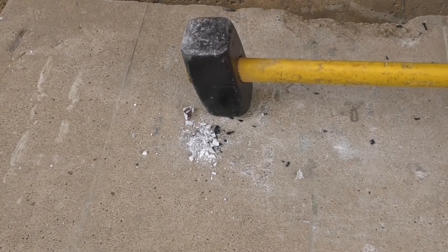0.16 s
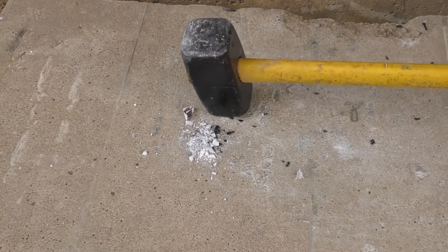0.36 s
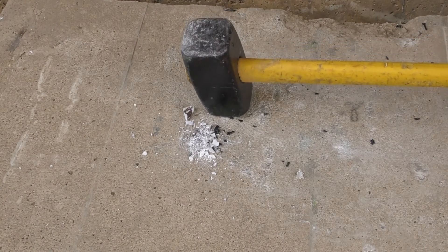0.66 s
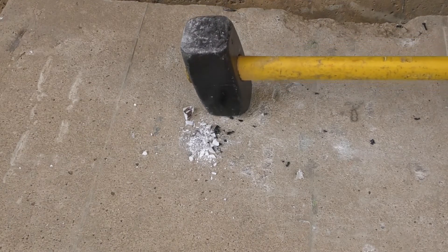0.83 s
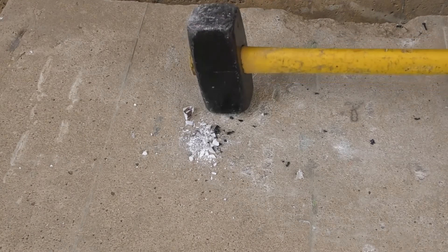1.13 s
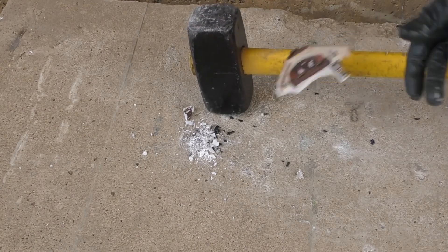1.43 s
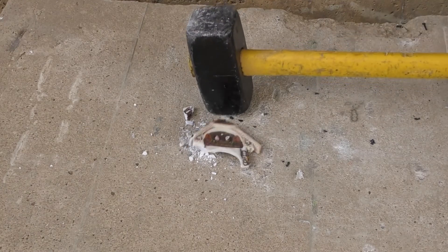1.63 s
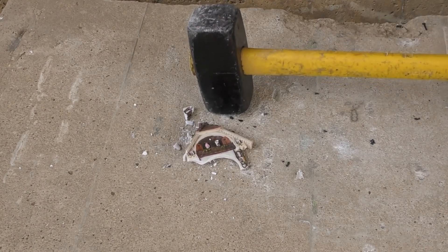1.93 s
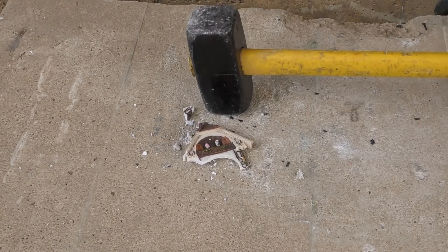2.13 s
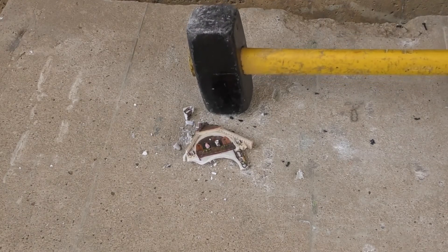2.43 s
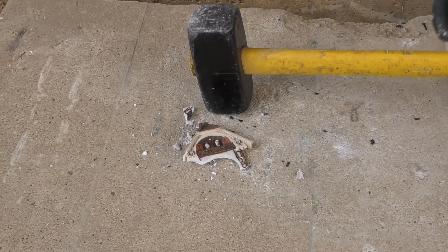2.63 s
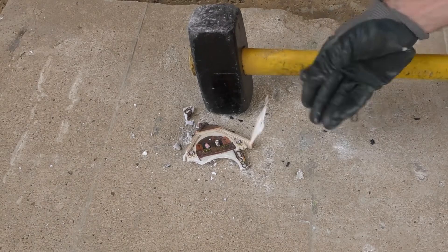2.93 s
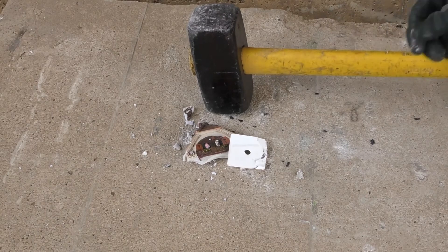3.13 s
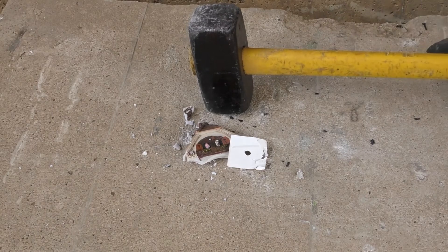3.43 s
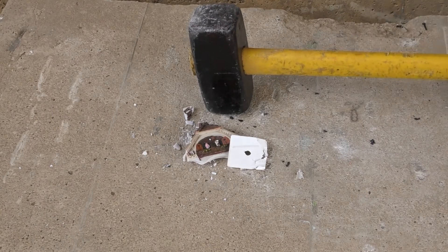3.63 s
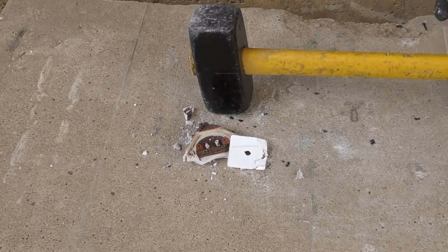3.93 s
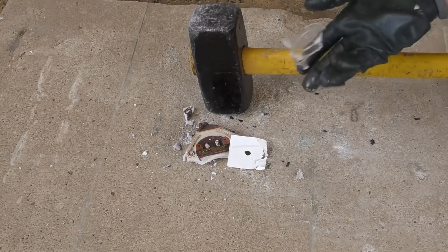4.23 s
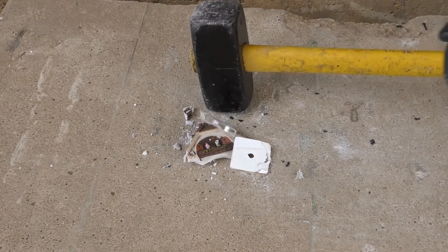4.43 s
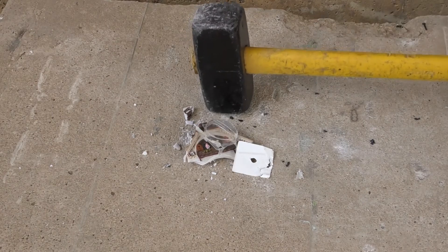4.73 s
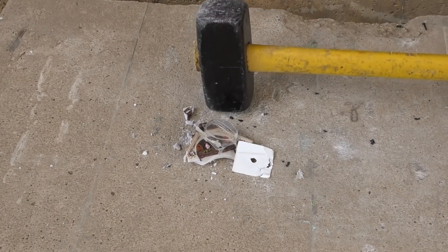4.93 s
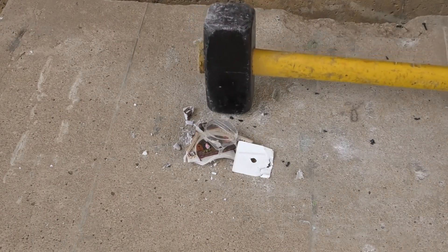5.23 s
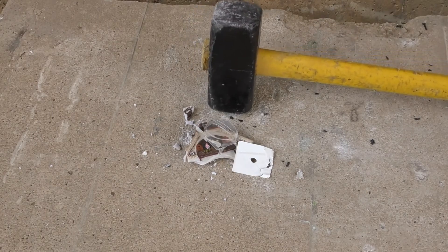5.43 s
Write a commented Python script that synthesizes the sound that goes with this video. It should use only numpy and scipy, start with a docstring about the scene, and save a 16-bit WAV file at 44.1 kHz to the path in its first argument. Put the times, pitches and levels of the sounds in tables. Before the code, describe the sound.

A sledgehammer head scrapes and clinks on gritty concrete, then three plastic pieces are tossed down, cracking and clattering over a low hum.

```python
"""A steel sledgehammer head is dragged over gritty concrete: knocks ring its modes, tiny slips scrape.
Three plastic pieces are then tossed down: a moulded shell thuds and cracks, a flat plate and a
clear piece clatter after it. Gloves rustle; rumble, hum and a background rush fill the hard room.
Automatic gain ducks after the loud landings."""
import sys
import numpy as np
from scipy import signal
from scipy.fft import rfft, irfft
from scipy.io import wavfile
from scipy.ndimage import uniform_filter1d

SR = 44100
rng = np.random.default_rng(int(sys.argv[2]) if len(sys.argv) > 2 else 0)


def to_wav(sig):
    """Store sig (one row per channel, or 1-D mono) as 16-bit WAV at the path in sys.argv[1].

    Samples outside -1..1 are clipped; the rate is SR.
    """
    pcm = np.clip(np.atleast_2d(sig), -1, 1) * 32767
    pcm = np.round(pcm).astype(np.int16)
    wavfile.write(sys.argv[1], SR, pcm.T)  # frames by channels


N = 246078
TIME_S = np.arange(N) / SR

# Contacts: t/s, level/dB, brightness/dB (high band over low), ping/dB (mid-band weight)
HEAD_KNOCKS = [(0.0315, -15.5, 8, -8), (0.0338, -11, -22, -0.5), (0.068, -24.5, -22, -10),
               (0.091, -28, -14, -12), (0.105, -25.5, 9, 4), (0.169, -24.5, 7, 1), (0.374, -14, 16, 5),
               (0.401, -14, 16, -4), (0.407, -11.5, 21, 7), (0.4125, -11, 32, -4), (0.4412, -20.5, 2, -13),
               (0.4605, -10, 15.5, 0), (0.6616, -16, 4, -1), (0.7478, -6.5, 2, 4), (0.905, -30.5, 29, 3),
               (1.251, -35.5, -2, -28)]
SHELL_KNOCKS = [(1.5653, -17.5, 0, 4), (1.5735, 2, -5, -28), (1.5826, 6.5, -6.5, 1.5),
                (1.5868, 9.5, 14, 14.5), (1.5922, -3, 5, -9), (1.6137, -27, -21, -5), (1.6205, -5, -3, 12),
                (1.702, -19, 22, -5), (1.72, -16, 26, 12), (1.746, -12.5, 22, -0.5), (1.7995, -7, 21, 1.5)]
PLATE_KNOCKS = [(3.0094, -22, -0.5, -1), (3.0262, -29, 3, 3.5), (3.0528, -21.5, 22, 4),
                (3.33, -33.5, 16, -1), (3.393, -30.5, -2, -2), (4.118, -38.5, 16, 11)]
CLEAR_KNOCKS = [(4.4292, -6.5, 29, 3), (4.439, -4, 4.5, 2), (4.4415, -3, 7, 2.5), (4.4443, -3.5, 8.5, -1),
                (4.451, -21, 13, 17), (4.487, -16, 4, 1), (4.518, -15, 10, 0.5), (4.5703, -9.5, 15, 5),
                (4.574, -17.5, -16, -2), (4.605, -30, -6, 6), (4.61, -21, -4, -11), (4.891, -33.5, 24, 0)]
# Low, mid, high contact bands: lower f/Hz, upper f/Hz
KNOCK_BANDS = [(1000, 4000), (4000, 9000), (9000, 16000)]
# Modes: f/Hz, relative level/dB, factor on contact t60
HEAD_MODES = [(2075, 2.5, 1.13), (2460, 13, 0.2), (2836, 6, 0.85), (5490, 0, 0.86), (6240, 3.5, 0.6),
              (6940, -22, 1.8), (9750, 4, 0.54), (10850, -4, 0.84), (11060, -19, 0.91), (11700, 0, 1.2)]
SHELL_MODES = [(2080, -1.5, 0.86), (2333, -1, 2.2), (2762, 2, 2.1), (3090, 6.5, 1.6), (4230, -5, 1.2),
               (5000, -11, 0.9), (5300, 3.5, 1.4), (6840, -1.5, 1.7), (8700, 2, 0.4), (10100, 7, 0.23)]
PLATE_MODES = [(2870, -4, 0.95), (3330, 5, 0.62), (4080, 5.5, 1), (5400, 1, 0.97), (7900, 6, 0.8),
               (10000, 11, 0.65), (11500, -8, .8)]
CLEAR_MODES = [(2170, -6.5, 2.6), (3038, -0.5, 1.2), (3444, 2, 1.4), (4450, -7, 0.84), (5600, 2, 1.3),
               (6780, 3.5, 1.5), (7460, 5, 0.74), (8850, 3, 1.2), (10000, -6, 0.53), (10600, 9.5, 0.82),
               (12800, -21, 0.73)]
# Weight hitting the slab: t/s, peak level/dB, f/Hz, t60/s
THUDS = [(0.0314, -21, 406, 0.0097), (0.0333, -20.5, 647, 0.0061), (0.6632, -19, 90.5, 0.054),
         (.748, -36, 373, 0.018), (1.5731, 7.5, 83, 0.019), (1.583, 7, 168, 0.02),
         (4.4416, -22, 190, 0.017)]
# Noise spectra: f/Hz, relative level/dB
RUMBLE_COLOUR = [(15, -16), (35, -10), (60, -0.5), (95, 6), (122, -3.5), (200, -38), (400, -85)]
HUM_COLOUR = [(70, -15), (125, -7), (165, -4), (210, 0.5), (270, -4), (330, -10), (400, -29), (480, -62),
              (900, -90)]
RUSH_COLOUR = [(450, -29.5), (680, -4.5), (850, -6.5), (1020, 3.5), (1400, 0), (1750, -5), (2200, -7),
               (3000, -14), (4200, -13.5), (5500, -22.5), (6800, -28.5), (10000, -14.5), (13000, -18.5),
               (16000, -20.5)]
LOW_WASH_COLOUR = [(250, 14), (400, 5.5), (500, 3), (700, 11.5), (1200, -38), (2000, -1), (3000, -7),
                   (6300, -5), (10000, -19), (16000, -26)]
DRAG_COLOUR = [(500, -6), (1500, -48), (2400, -1.5), (2950, -15), (3500, 1.5), (4700, -12), (6200, 0),
               (8200, -1), (10000, 6), (12000, 1), (16000, -7)]
GRIND_COLOUR = [(500, -12), (1100, 0), (1600, 0), (2100, 3), (2500, -2), (2950, 6.5), (3300, -26),
                (4500, -34), (16000, -45)]
SQUEAK_COLOUR = [(3000, -54), (5600, -27), (6050, 11), (6200, 2), (6400, -20), (6900, -30), (12000, -50)]
SCUFF_COLOUR = [(2000, -33), (3200, -2), (5100, 5), (6600, 5), (8000, -10), (11000, -18), (13500, 2),
                (16000, -16)]
GLOVE_COLOUR = [(1000, -19), (3000, -5), (5400, -7), (6800, -10), (8500, -2), (10500, 2), (12000, 0.5),
                (14000, -5), (16000, -8)]
SKID_COLOUR = [(800, -48), (2200, -0.5), (3200, -7), (5200, -5), (6700, -7), (8000, -7), (11000, 1.5),
               (13000, -8), (16000, -5)]
# Pulls on the head: peak t/s, length/s, relative hiss level/dB, relative grind level/dB
SLIDES = [(0.024, 0.24, -27, -39), (0.106, 0.9, -37, -42), (0.353, 0.15, -31.5, -59),
          (.42, .1, -9.5, -25.5), (0.557, 0.39, -33, -27), (0.709, 0.18, -25, -51),
          (0.789, 0.076, -33, -30)]
# Swells and friction strokes: peak t/s, length/s, relative level/dB
RUMBLE_SWELLS = [(.03, 0.16, -40), (.74, 0.27, -31.5), (1.26, 0.14, -37.5), (1.76, 0.67, -33),
                 (3.15, .45, -44), (4.08, 0.12, -30), (5.05, 0.17, -33)]
DRONE_SWELLS = [(3.42, 2.9, -43.5)]
SQUEAKS = [(.435, 0.21, -30), (.535, .15, -33)]  # steel on stone
SCUFFS = [(5.426, 0.046, -26.5)]  # head shifts as the handle is raised
GLOVE_RUBS = [(.922, 0.088, -36.5), (1.045, 0.45, -43.5), (1.39, 0.11, -43), (2.125, 0.1, -37.5),
              (2.29, 0.57, -33.5), (2.31, 0.032, -24), (2.405, 0.062, -33.5), (2.548, 0.089, -37),
              (2.635, 0.042, -42.5), (2.865, 0.089, -41.5), (3.465, 0.27, -34), (3.58, .13, -40.5),
              (3.672, .11, -31.5), (3.798, 0.071, -40), (3.938, .14, -44), (4.97, 0.15, -38),
              (5.138, 0.058, -39.5), (5.25, 0.35, -44), (5.415, .15, -39.5)]
SKIDS = [(1.63, .09, -21), (1.755, 0.19, -21), (4.495, 0.096, -15.5), (4.67, 0.58, -24)]
# Background envelopes: t/s, relative level/dB
HUM_LEVEL = [(0, -41.5), (.55, -34), (1.12, -35), (1.4, -40.5), (2, -37), (2.7, -43), (3.6, -40.5),
             (4.25, -36), (4.6, -38), (5.58, -41)]
RUSH_LEVEL = [(0, -42.5), (.5, -40.5), (1.45, -41), (1.75, -47), (2.45, -42), (3.6, -43.5), (4.35, -38.5),
              (4.45, -42), (5.58, -44.5)]
LOW_WASH_LEVEL = [(0, -45.5), (.7, -44), (1.5, -47.5), (2.1, -76), (3.4, -62), (4.4, -54), (4.68, -38),
                  (5.58, -44.5)]
# Room decay: f/Hz, t60/s
ROOM_T60 = [(200, 0.33), (900, 0.079), (2000, 1), (3000, 1.24), (5300, 0.81), (7500, 0.61), (10500, 0.78),
            (16000, 0.5)]


def gain_of(db):
    """dB to amplitude."""
    return 10 ** (np.asarray(db) / 20)


def unit_rms(x):
    """Scale to rms 1."""
    return x / np.sqrt(np.mean(x ** 2) + 1e-20)


def lookup(table, hz):
    """Interpolate over log frequency."""
    table_hz, value = np.transpose(table)
    return np.interp(np.log(hz + 1), np.log(table_hz + 1), value)


def add(mix, start_s, sound):
    """Mix in place from start_s."""
    part = mix[round(start_s * SR):][:len(sound)]
    part += sound[:len(part)]


def strokes(rows, rise_share=0.47, end_drop_db=26.5, roundness=1.28):
    """Envelope of rise-and-fall strokes, summed in power."""
    power = np.zeros(N)
    for peak_s, length_s, db in rows:
        away = np.maximum((peak_s - TIME_S) / rise_share, (TIME_S - peak_s) / (1 - rise_share)) / length_s
        near = away < 4
        power[near] += gain_of(db - end_drop_db * away[near] ** roundness) ** 2
    return np.sqrt(power)


def wander(depth_db, rate_hz):
    """Randomly drifting gain."""
    steps = rng.standard_normal(200)
    return gain_of(depth_db * np.interp(TIME_S * rate_hz, np.arange(len(steps)), steps))


def envelope(curve):
    """Level curve to gain per sample."""
    return gain_of(np.interp(TIME_S, *np.transpose(curve)))


def coloured(x, colour, patchy_db):
    """Shape noise to a spectrum whose patches swell and fade separately; rms 1."""
    frames = signal.stft(x, nperseg=1024, noverlap=768)[2]
    patches = uniform_filter1d(rng.standard_normal(frames.shape), size=5, axis=0)
    patches = unit_rms(uniform_filter1d(patches, size=9, axis=1))
    x = signal.istft(frames * gain_of(patchy_db * patches), nperseg=1024, noverlap=768)[1][:N]
    response = gain_of(lookup(colour, np.fft.rfftfreq(N, 1 / SR)))
    return unit_rms(irfft(rfft(x) * response, N))


def noise(colour, trim_db, patchy_db=0):
    """Coloured Gaussian noise."""
    return coloured(rng.standard_normal(N), colour, patchy_db) * gain_of(trim_db)


def rumble():
    """Low noise, drifting and swelling."""
    swell = np.hypot(gain_of(-46) * wander(depth_db=2.5, rate_hz=1.7), strokes(RUMBLE_SWELLS))
    return noise(RUMBLE_COLOUR, trim_db=-1.2) * swell


def hum(drone_hz=58.5):
    """Rough noise hum; a deep tone comes and goes."""
    drone = unit_rms(np.sin(2 * np.pi * drone_hz * TIME_S)) * strokes(DRONE_SWELLS)
    return noise(HUM_COLOUR, trim_db=1) * envelope(HUM_LEVEL) + drone


def background_rush():
    """Rush and low wash; their level curves sink after the loud landing and later return."""
    rush = noise(RUSH_COLOUR, trim_db=0, patchy_db=3) * envelope(RUSH_LEVEL)
    low_wash = noise(LOW_WASH_COLOUR, trim_db=0.5, patchy_db=3) * envelope(LOW_WASH_LEVEL)
    return rush + low_wash


def friction(pressure, colour, grain_db, slips_per_s, trim_db, patchy_db):
    """Dense train of tiny uneven slips, scaled by stroke pressure."""
    sizes = gain_of(grain_db * np.minimum(rng.exponential(1, N), 4))
    slips = rng.choice([-1, 1], N) * sizes * (rng.random(N) < slips_per_s / SR)
    return coloured(slips, colour, patchy_db) * gain_of(trim_db) * pressure


def knocks(rows, modes, t60_at_0db_s, crack_db, snap_db, detune, highpass_hz):
    """Each contact: snap, crack and ringing modes; hardness splits the energy over three bands."""
    out, t = np.zeros(N), np.arange(SR // 10) / SR
    mode_hz, mode_db, t60_factor = np.transpose(modes)[:, :, None]
    attack_samples, snap_t60_s, halving_db = 3 * SR // 1000, 0.0019, 15.5
    filters = [signal.butter(3, band, "bandpass", fs=SR, output="sos") for band in KNOCK_BANDS]
    highpass = signal.butter(2, highpass_hz, "highpass", fs=SR)  # small bodies radiate little bass
    for start_s, level_db, bright_db, ping_db in rows:
        t60_s = t60_at_0db_s * 0.5 ** (level_db / halving_db)  # the slab damps harder blows more
        burst = gain_of(crack_db - 60 * t / t60_s) + gain_of(snap_db - 60 * t / snap_t60_s)
        crack = signal.lfilter(*highpass, rng.standard_normal(len(t)) * burst)
        # contact point varies each mode's strength and pitch
        struck = gain_of(2 * rng.standard_normal(mode_hz.shape)) * rng.choice([-1, 1], mode_hz.shape)
        pitch_hz = mode_hz * (1 + detune * rng.standard_normal(mode_hz.shape))
        decay = gain_of(mode_db - 60 * t / (t60_s * t60_factor))
        ring = (struck * decay * np.sin(2 * np.pi * pitch_hz * t)).sum(0)
        shares = gain_of([-bright_db / 2, ping_db, bright_db / 2])
        for sos, share in zip(filters, shares / np.linalg.norm(shares)):
            band = signal.sosfilt(sos, crack + ring)
            add(out, start_s, gain_of(level_db) * share * band / np.std(band[:attack_samples]))
    return out


def hammer():
    """Steel head knocks and slides in short pulls; grit hisses, and grinds lower under full weight."""
    speed = strokes([(peak_s, length_s, hiss_db) for peak_s, length_s, hiss_db, _ in SLIDES])
    weight = strokes([(peak_s, length_s, grind_db) for peak_s, length_s, _, grind_db in SLIDES])
    hiss = friction(speed, DRAG_COLOUR, grain_db=8, slips_per_s=9100, trim_db=-0.5, patchy_db=6)
    grind = friction(weight, GRIND_COLOUR, grain_db=0, slips_per_s=770, trim_db=-3.5, patchy_db=5)
    squeak = friction(strokes(SQUEAKS), SQUEAK_COLOUR,
                      grain_db=6.5, slips_per_s=1200, trim_db=-2, patchy_db=-1)
    scuff = friction(strokes(SCUFFS), SCUFF_COLOUR,
                     grain_db=5.5, slips_per_s=3400, trim_db=-2.5, patchy_db=4)
    clinks = knocks(HEAD_KNOCKS, HEAD_MODES, t60_at_0db_s=0.015,
                    crack_db=0, snap_db=5, detune=0.02, highpass_hz=403)
    return clinks + hiss + grind + squeak + scuff


def thuds(rise_s=0.0031):
    """A landing pushes the air and swings back, dying within a few cycles."""
    out, t = np.zeros(N), np.arange(SR // 5) / SR
    for start_s, peak_db, hz, t60_s in THUDS:
        push = np.sin(2 * np.pi * hz * t) * gain_of(-60 * t / t60_s) * (1 - np.exp(-t / rise_s))
        add(out, start_s, -gain_of(peak_db) * push / push.max())
    return out


def gloves():
    """Work gloves rub on grip and release, rustling faintly between."""
    fidget = gain_of(-57) * wander(depth_db=3.5, rate_hz=14)
    pressure = np.hypot(strokes(GLOVE_RUBS), fidget)
    return friction(pressure, GLOVE_COLOUR, grain_db=4.5, slips_per_s=12000, trim_db=2, patchy_db=2.5)


def plastic():
    """Three pieces land, bounce and skid to rest."""
    shell = knocks(SHELL_KNOCKS, SHELL_MODES, t60_at_0db_s=0.023,
                   crack_db=3, snap_db=-1, detune=0.021, highpass_hz=1660)
    plate = knocks(PLATE_KNOCKS, PLATE_MODES, t60_at_0db_s=0.006,
                   crack_db=6.5, snap_db=11, detune=0.034, highpass_hz=2000)
    clear = knocks(CLEAR_KNOCKS, CLEAR_MODES, t60_at_0db_s=0.026,
                   crack_db=12, snap_db=13, detune=0.028, highpass_hz=2510)
    skids = friction(strokes(SKIDS), SKID_COLOUR,
                     grain_db=-4, slips_per_s=6500, trim_db=-7, patchy_db=3.5)
    return shell + plate + clear + skids


def room(x, echo_db, tail_db, build_s=0.045):
    """Eight quick echoes off near walls, then a long bright tail."""
    hz, t, frames = signal.stft(rng.standard_normal(SR * 3 // 2), SR, nperseg=256)
    decay = gain_of(-60 * t / lookup(ROOM_T60, hz)[:, None])
    tail = signal.istft(frames * decay, SR, nperseg=256)[1]
    tail *= np.minimum(np.arange(len(tail)) / SR / build_s, 1)
    response = gain_of(tail_db) * tail / np.linalg.norm(tail)
    delays_s = rng.uniform(0.0033, 0.02, size=8)
    response[(delays_s * SR).astype(int)] += gain_of(echo_db) * rng.choice([-1, 1], size=8)
    return signal.fftconvolve(x, response)[:N]


def gain_control(x, threshold_db, ratio, recovery_s):
    """Gain drops as 3 ms mean power passes the threshold, then creeps back."""
    power = signal.lfilter(np.ones(132) / 132, 1, x ** 2)
    cut_db = np.maximum(10 * np.log10(power + 1e-12) - threshold_db, 0) * (1 - 1 / ratio)
    fade = np.exp(-TIME_S / recovery_s)
    held_db = np.maximum.accumulate(cut_db / fade) * fade
    return x * gain_of(-uniform_filter1d(held_db, size=22))


def scene():
    """Mono mix: hammer, plastic and gloves with reverb; thuds and background dry."""
    near = hammer() + plastic() + gloves()
    background = rumble() + hum() + background_rush()
    return (near + room(near, echo_db=-25.5, tail_db=-17.5) + thuds() + background)[None]


def record(dry):
    """Gain control, hard clip, low-pass."""
    ducked = gain_control(dry[0], threshold_db=-13.5, ratio=4.46, recovery_s=0.74)
    lowpass = signal.firwin(511, cutoff=15950, window=("kaiser", 8), fs=SR)
    return signal.oaconvolve(np.clip(ducked, -1, 1), lowpass, "same")[None]


dry = scene()
out = record(dry)
to_wav(out)
```